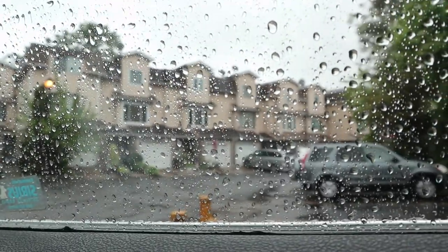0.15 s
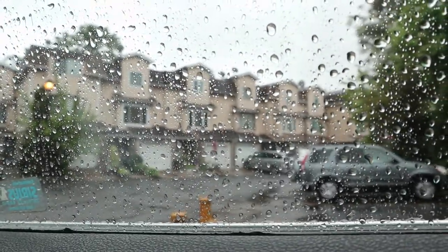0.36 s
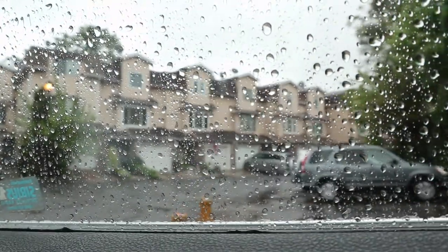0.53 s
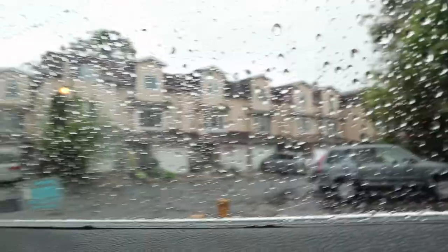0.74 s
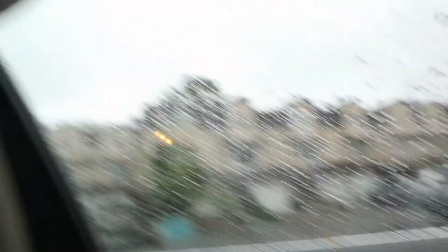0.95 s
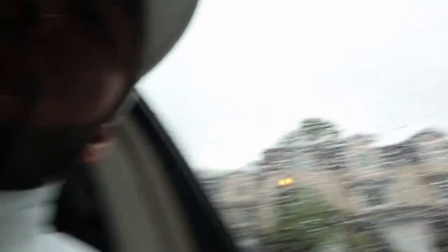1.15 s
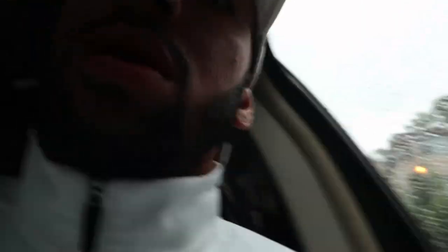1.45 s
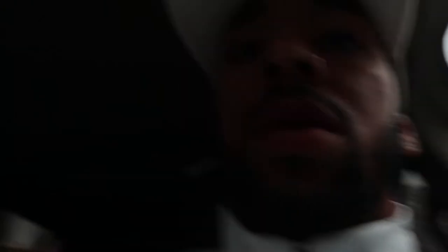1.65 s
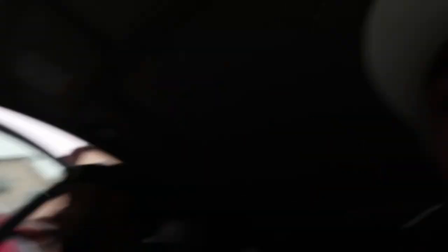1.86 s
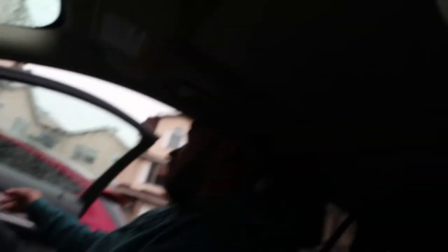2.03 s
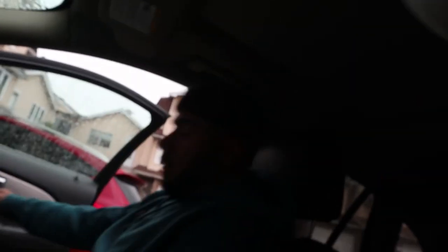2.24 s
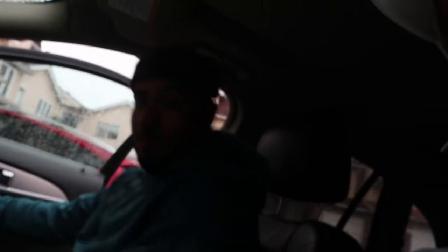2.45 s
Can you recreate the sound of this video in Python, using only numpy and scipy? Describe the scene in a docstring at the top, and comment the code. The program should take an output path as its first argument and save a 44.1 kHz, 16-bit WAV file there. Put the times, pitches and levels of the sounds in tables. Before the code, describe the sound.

Rain patters dully on a parked car while a door latch clunks open and cloth rustles inside

```python
"""Rain on a parked car, heard from the seat with a close pair of microphones, as mid and side parts.
Throughout, dull rain (fine ringing drops over hiss), swelling late, and the drumming body (low rings).
From 0.24 s a latch knocks (noise bursts) among thumps (damped rings) and snaps (short cracks);
a loose panel buzzes (pulses into resonances), with thin squeaks (wavering sines) and coloured rubs.
From 0.8 s the door opens and lets in the rain's hiss; from 1.1 s a jacket rustles (ringing grains)."""
import sys
import numpy as np
from scipy import signal
from scipy.fft import rfft, irfft
from scipy.io import wavfile

SR = 44100
rng = np.random.default_rng(int(sys.argv[2]) if len(sys.argv) > 2 else 0)


def volts_from_decibels(level):
    """Turn decibel levels (scalar or array-like) into linear amplitude factors."""
    exponent = np.asarray(level, float) / 20
    return 10 ** exponent


def waveform_to_disk(signal):
    """Save audio, clipped to [-1, 1], as 16-bit WAV at the path in sys.argv[1]."""
    frames = np.transpose(np.atleast_2d(signal))
    scaled = np.clip(frames, -1, 1) * 32767
    samples = np.round(scaled).astype(np.int16)
    wavfile.write(sys.argv[1], SR, samples)


N = 114660   # length [samples]


def rms_one(x):
    """Scale each row to rms 1."""
    return x / np.sqrt(np.mean(x ** 2, axis=-1, keepdims=True) + 1e-20)


def in_time(rows, outside=None):
    """Interpolate every column after the time to one value a sample."""
    times, *columns = np.transpose(rows)
    now = np.arange(N) / SR
    return [np.interp(now, times, column, outside, outside) for column in columns]


def colour(x, points, tilt_db=0.0):
    """Filter by a (frequency [Hz], level [dB]) table, tilted by dB per octave about 2 kHz."""
    hz = np.maximum(np.fft.rfftfreq(x.shape[-1], 1 / SR), 5)
    table = np.array(points)
    db = np.interp(np.log(hz), np.log(table[:, 0]), table[:, 1])
    db = db + tilt_db * np.log2(hz / 2000)
    return irfft(rfft(x) * volts_from_decibels(db), x.shape[-1])


def drift(rate_hz):
    """Slow random wander of rms 1: noise through two equal low-pass poles."""
    step = 40   # samples between computed points
    r = np.exp(-2 * np.pi * rate_hz * step / SR)
    noise = rng.standard_normal(N // step + 2002)
    slow = signal.lfilter([1], [1, -2 * r, r * r], noise)[2000:]   # settled part
    return np.interp(np.arange(N) / step, np.arange(len(slow)), rms_one(slow))


def resonate(x, hz, width_hz):
    """One damped resonance with gain about 1 at its peak."""
    r = np.exp(-np.pi * width_hz / SR)
    top = np.array([1, 0, -1]) * (1 - r * r) / 2
    return signal.lfilter(top, [1, -2 * r * np.cos(2 * np.pi * hz / SR), r * r], x)


def grains(per_s, spread_db, low_hz, high_hz, cycles, count=14):
    """Random clicks dealt to resonators spread in pitch; more cycles ring longer."""
    sizes = volts_from_decibels(spread_db * np.minimum(rng.exponential(1, (2, N)), 5))
    sizes = sizes * rng.choice([-1, 1], (2, N))
    clicks = sizes * (rng.random((2, N)) < per_s / SR) + 1e-18
    dealt = rng.integers(0, count, (2, N))
    pitches = np.geomspace(low_hz, high_hz, count)
    return sum(resonate(clicks * (dealt == k), hz, 2.83 * hz / cycles) for k, hz in enumerate(pitches))


def contacts(length):
    """An uneven run of hard touches over hiss, with a set touch near the start."""
    per_s, spread_db, hiss = 2200, 3.5, 0.5
    touched = rng.random(length) < per_s / SR
    sizes = volts_from_decibels(spread_db * np.minimum(rng.exponential(1, (2, length)), 3))
    sizes = sizes * rng.choice([-1, 1], (2, length))
    first = volts_from_decibels(2 * spread_db) * (np.arange(length) == round(KNOCK_RISE_S * SR))
    touches = np.where(first > 0, first, sizes * touched)
    return rms_one(touches) + hiss * rng.standard_normal((2, length))


def blow(t, rise_s, t60_s):
    """Envelope: quick rise, exponential fall."""
    return (1 - np.exp(-t / rise_s)) * volts_from_decibels(-60 * t / t60_s)


def add(out, start_s, piece):
    """Mix a piece in at its start time."""
    i = int(start_s * SR)
    out[:, i:i + piece.shape[-1]] += piece[..., :N - i]


# dull rain, there throughout and swelling towards the end: (time [s], level [dB])
DULL_RAIN = [(0, -50.5), (.22, -54), (.5, -56), (.75, -53), (2.6, -41)]
# its tone: (frequency [Hz], relative level [dB])
DULL_RAIN_TONE = [(180, -23), (300, -5), (420, -3), (700, -7.5), (1050, -8), (2000, -10.5), (4000, -17.5),
                  (8000, -32), (15400, -71)]
# rain through the open door: (time [s], level [dB])
OPEN_RAIN = [(.80, -61), (.88, -49.5), (.95, -44.5), (1.2, -43.5), (1.9, -46), (2.2, -43), (2.6, -46.5)]
# its tone: (frequency [Hz], relative level [dB])
OPEN_RAIN_TONE = [(180, -28), (300, 4.5), (366, -10.5), (590, -15), (719, -6.5), (984, -4.5),
                  (10200, -24.5), (13100, -27.5), (15400, -82)]
DROPS_PER_S, DROP_SPREAD_DB, DROP_SHARE, FLICKER_DB = 1500, 2.5, 0.4, 1.3


def rain():
    """Dense small drops over smooth hiss: a dull layer throughout, a bright one through the open door."""
    out = np.zeros((2, N))
    for path, tone in ((DULL_RAIN, DULL_RAIN_TONE), (OPEN_RAIN, OPEN_RAIN_TONE)):
        level_db, = in_time(path)
        drops = rms_one(grains(DROPS_PER_S, DROP_SPREAD_DB, 316, 8700, cycles=1.9))
        hiss = rng.standard_normal((2, N))
        raw = DROP_SHARE * drops + (1 - DROP_SHARE) * hiss
        out += volts_from_decibels(level_db + FLICKER_DB * drift(24)) * rms_one(colour(raw, tone))
    return out


# drumming of roof and body: (time [s], level above 85 Hz [dB], level of the deep rumble [dB])
DRUMMING = [(0, -41, -44.5), (.2, -43, -46.5), (.36, -31, -33.5), (.51, -52.5, -37.5), (.82, -48, -53),
            (1.06, -44.5, -43), (1.3, -42, -46), (1.52, -31, -44), (1.72, -31, -38), (1.9, -31, -38),
            (2.2, -38, -45), (2.4, -38.5, -39), (2.6, -39.5, -45)]
# its tone: (frequency [Hz], relative level [dB])
DRUMMING_TONE = [(12, -40.5), (22, -10), (49, 4.5), (75, -3.5), (112, -3.5), (230, -7.5), (300, -16),
                 (420, -22.5), (800, -57)]


def drumming():
    """Drops and small movements set the body's low modes going, over a deep rumble."""
    drum_db, deep_db = in_time(DRUMMING)
    hits = grains(per_s=1500, spread_db=1.5, low_hz=26, high_hz=503, cycles=3.74)
    raw = colour(hits, DRUMMING_TONE)
    deep = signal.sosfilt(signal.butter(4, 85, "low", fs=SR, output="sos"), raw)
    drum = signal.sosfilt(signal.butter(4, 85, "high", fs=SR, output="sos"), raw)
    return volts_from_decibels(drum_db) * rms_one(drum) + volts_from_decibels(deep_db) * rms_one(deep)


# knocks: (time [s], level [dB], centre [Hz], t60 [s], tilt [dB per octave])
KNOCK_EVENTS = [(.239, -33.5, 3270, 0.092, 1), (.246, -19, 920, 0.13, -2), (.614, -43, 1660, 0.15, -1),
                (.826, -32.5, 2070, 0.065, -2), (0.851, -31, 2860, 0.068, -1),
                (0.860, -26.5, 1240, 0.057, 2), (1.131, -39.5, 1590, 0.042, 4),
                (1.286, -43, 560, 0.063, -7), (1.567, -24, 830, 0.13, -3), (1.615, -18.5, 584, 0.085, -3),
                (1.663, -24, 460, 0.12, -8.5), (1.707, -20.5, 748, 0.054, -5), (1.814, -27.5, 332, .05, -4),
                (1.8525, -19, 1086, 0.096, -2.5), (2.0449, -25.5, 407, 0.06, -4.5),
                (2.091, -36, 1040, 0.041, -1), (2.112, -27, 2370, 0.033, 0), (2.130, -23.5, 2100, 0.071, 1),
                (2.178, -24.5, 607, 0.08, -1)]
# tone of knocks and snaps: (frequency [Hz], relative level [dB])
KNOCK_TONE = [(240, -10), (400, -4), (503, -6.5), (1020, -8), (1490, -9.5), (2180, -7), (7530, -26.5),
              (11600, -31), (15400, -45)]
KNOCK_RISE_S, KNOCK_BROAD_DB, KNOCK_WIDTH = 0.0006, -3.5, 0.24   # width as a share of the centre
TAIL_DB, TAIL_RISE_S, TAIL_T60_S, TAIL_CUT_HZ = -9, 0.0017, 0.26, 1400


def knocks():
    """A burst of hard contacts with its own resonance, then a dull tail from the cabin."""
    out, t = np.zeros((2, N)), np.arange(SR // 3) / SR
    dull = signal.butter(1, TAIL_CUT_HZ, fs=SR, output="sos")
    for start_s, db, hz, t60_s, tilt_db in KNOCK_EVENTS:
        noise = rms_one(colour(contacts(len(t)), KNOCK_TONE, tilt_db))
        burst = volts_from_decibels(KNOCK_BROAD_DB) * noise + rms_one(resonate(noise, hz, KNOCK_WIDTH * hz))
        tail = signal.sosfilt(dull, noise[:, ::-1])   # reversed, so it does not repeat the burst
        knock = burst * blow(t, KNOCK_RISE_S, t60_s)
        knock = knock + volts_from_decibels(TAIL_DB) * tail * blow(t, TAIL_RISE_S, TAIL_T60_S)
        add(out, start_s, volts_from_decibels(db) * knock)
    return out


# low thumps: (time [s], level [dB], pitch [Hz], t60 [s])
THUMP_EVENTS = [(.245, 0.5, 192.2, 0.067), (0.241, -13, 78.4, 0.14), (0.264, -22.5, 287.7, 0.2),
                (0.277, -4.5, 128.7, 0.078), (.298, -14.5, 136.1, 0.15), (.322, -13.5, 131.3, 0.11),
                (0.429, -16, 62.5, 0.13), (0.444, -17.5, 170, 0.05), (0.825, -11, 237, 0.058),
                (.853, -10.5, 201, 0.059), (0.859, -25, 62.5, 0.174), (0.883, -22.5, 151.5, 0.14),
                (0.918, -23.5, 187.6, 0.12), (1.006, -20, 177, 0.079), (1.215, -18.5, 137, 0.11),
                (1.218, -19.5, 52.6, 0.099), (1.286, -22, 167.1, 0.05), (1.324, -15.5, 53.8, 0.28),
                (1.465, -17, 110, 0.086), (1.542, -13, 170, 0.088), (1.541, -16.5, 70, 0.19),
                (1.58, -10, 113, 0.07), (1.613, -10.5, 134.4, 0.12), (1.661, -9, 88, 0.073),
                (1.698, -25, 150, 0.19), (1.814, -13.5, 126, 0.078), (1.858, -4, 171.6, 0.065),
                (2.046, -19, 165, 0.079), (2.131, -18.5, 145.3, 0.053), (2.174, -20.5, 115, 0.13),
                (2.256, -20.5, 119.8, 0.34), (2.294, -10, 100, 0.052)]
THUMP_RISE_SHARE = 0.059   # rise as a share of t60
THUMP_HOLD = 1.242   # above 1 the ring holds, then stops short
THUMP_SECOND_RATIO, THUMP_SECOND_DB = 1.45, -11   # upper partner


def thumps():
    """Each thump is a damped low ring with a weaker upper partner."""
    out, t = np.zeros((2, N)), np.arange(SR // 2) / SR
    for start_s, db, hz, t60_s in THUMP_EVENTS:
        ring = np.sin(2 * np.pi * hz * t)
        ring = ring + volts_from_decibels(THUMP_SECOND_DB) * np.sin(2 * np.pi * hz * THUMP_SECOND_RATIO * t)
        age = t / t60_s
        envelope = (1 - np.exp(-age / THUMP_RISE_SHARE)) * volts_from_decibels(-60 * age ** THUMP_HOLD)
        add(out, start_s, volts_from_decibels(db) * envelope * ring)
    return out


# sharp snaps: (time [s], level [dB])
SNAP_EVENTS = [(.247, -15.5), (0.828, -24), (0.865, -17), (1.851, -22), (2.130, -16.5), (2.178, -25)]


def snaps():
    """Bare short cracks of noise in the tone of the knocks, tilted down, without a tail."""
    out, t = np.zeros((2, N)), np.arange(SR // 3) / SR
    for start_s, db in SNAP_EVENTS:
        crack = rms_one(colour(rng.standard_normal((2, len(t))), KNOCK_TONE, tilt_db=-2.0))
        add(out, start_s, volts_from_decibels(db) * crack * blow(t, rise_s=0.0001, t60_s=0.009))
    return out


# resonances of the loose panel: (frequency [Hz], width [Hz], relative level [dB])
PANEL_MODES = [(500, 230, -2.5), (850, 410, -2), (1190, 250, -1.5), (1900, 800, -23.5)]
BUZZ_START_S, BUZZ_DB, BUZZ_RISE_S, BUZZ_T60_S = 0.28, -32.5, 0.011, 0.16
BUZZ_HZ, BUZZ_JITTER, BUZZ_UNEVEN_DB = 170, 0.028, 2.5   # jitter as a share of the rate
BUZZ_ROUGH, BUZZ_HOLD = 0.4, 1.8   # rattle between contacts; above 1 holds, then stops


def buzz():
    """Contacts of a loose panel, with rattle between them, drive its broad resonances."""
    out, t = np.zeros((2, N)), np.arange(SR // 4) / SR
    turns = np.cumsum(BUZZ_HZ * (1 + BUZZ_JITTER * drift(40)[:len(t)])) / SR
    clicks = np.diff(np.floor(turns), prepend=0)   # one click a turn
    clicks = clicks * volts_from_decibels(BUZZ_UNEVEN_DB * rng.standard_normal(len(t)))
    clicks = rms_one(clicks) + BUZZ_ROUGH * rms_one(contacts(len(t)))
    body = np.zeros((2, len(t)))
    for k, (hz, width_hz, db) in enumerate(PANEL_MODES):
        body += volts_from_decibels(db) * (-1) ** k * resonate(clicks, hz, width_hz)   # alternate signs
    envelope = (1 - np.exp(-t / BUZZ_RISE_S)) * volts_from_decibels(-60 * (t / BUZZ_T60_S) ** BUZZ_HOLD)
    add(out, BUZZ_START_S, volts_from_decibels(BUZZ_DB) * rms_one(body) * envelope)
    return out


# thin wavering squeaks: (time [s], length [s], pitch [Hz], level [dB])
SQUEAK_EVENTS = [(.30, 0.13, 3890, -62), (0.348, 0.03, 4870, -61), (.36, .08, 2740, -63),
                 (0.419, 0.063, 1403, -52.5), (1.97, 0.075, 661, -40.5)]
SQUEAK_WAVER, SQUEAK_FLUTTER_DB = 0.008, 4.5   # waver as a share of the pitch


def squeaks():
    """Near sines that waver in pitch and flutter in level."""
    out = np.zeros((2, N))
    for start_s, length_s, hz, db in SQUEAK_EVENTS:
        size = int(length_s * SR)
        pitch = hz * (1 + SQUEAK_WAVER * drift(30)[:size])
        tone = np.sin(2 * np.pi * np.cumsum(pitch) / SR)
        swell = np.sqrt(2 * np.sqrt(np.hanning(size)))
        add(out, start_s, volts_from_decibels(db + SQUEAK_FLUTTER_DB * drift(180)[:size]) * tone * swell)
    return out


# rubs of cloth, seat, handle and hinge:
# (time [s], length [s], centre [Hz], width of each of two passes [Hz], level [dB])
RUB_EVENTS = [(0.369, 0.068, 1900, 905, -48.5), (0.596, 0.047, 3100, 1510, -48),
              (0.646, 0.048, 2410, 1550, -51.5), (0.969, 0.074, 2920, 3100, -43.5),
              (0.987, .02, 930, 250, -36), (1.326, 0.15, 3610, 352, -40), (1.321, 0.12, 1870, 243, -40.5),
              (1.372, 0.051, 1510, 250, -33), (1.378, 0.029, 2470, 300, -37),
              (1.494, 0.035, 1400, 300, -32), (1.546, 0.03, 800, 250, -27.5),
              (1.552, 0.04, 1930, 1470, -28), (1.543, 0.03, 4900, 3030, -37),
              (1.657, 0.036, 2010, 450, -23), (1.653, 0.0342, 1180, 250, -23.5),
              (1.717, 0.034, 1880, 450, -22.5), (1.722, 0.037, 2680, 500, -31.5),
              (1.729, .03, 1360, 248, -27), (1.729, .028, 3530, 500, -35), (1.906, 0.068, 650, 200, -38),
              (2.248, 0.1, 420, 447, -35), (2.499, 0.093, 1900, 396, -42), (2.581, 0.02, 850, 300, -40)]


def rubs():
    """Grainy contacts twice through a resonance, swelling and fading."""
    out = np.zeros((2, N))
    for start_s, length_s, hz, width_hz, db in RUB_EVENTS:
        once = resonate(contacts(SR // 4), hz, width_hz)
        line = rms_one(resonate(once, hz, width_hz))[:, -int(length_s * SR):]
        add(out, start_s, volts_from_decibels(db) * line * np.sqrt(np.hanning(line.shape[1])))
    return out


# jacket and seat cloth rubbing: (time [s], level [dB])
RUSTLE_LEVEL = [(1.1, -64), (1.3, -42), (1.39, -33), (1.43, -34), (1.5, -30), (1.53, -31.5), (1.57, -22.5),
                (1.585, -33), (1.605, -32.5), (1.62, -29), (1.67, -23), (1.695, -33), (1.745, -28.5),
                (1.765, -34), (1.81, -33.5), (1.845, -36), (1.9, -39), (2.0, -45.5), (2.1, -36),
                (2.24, -43), (2.32, -42.5), (2.45, -42.5), (2.6, -35.5)]
# its tone: (frequency [Hz], relative level [dB])
RUSTLE_TONE = [(180, -32), (300, -14), (600, -3.5), (900, -8), (2000, -8), (4000, -17), (8000, -31),
               (14000, -44.5)]
RUSTLE_RAGGED_DB = 2.0


def rustle():
    """Cloth slips in many short ringing grains, in ragged bursts."""
    level_db, = in_time(RUSTLE_LEVEL, outside=-120)
    raw = grains(per_s=12000, spread_db=2.0, low_hz=355, high_hz=12100, cycles=25.0, count=30)
    return volts_from_decibels(level_db + RUSTLE_RAGGED_DB * drift(40)) * rms_one(colour(raw, RUSTLE_TONE))


# width of the pair: (frequency [Hz], gain of the side part [dB])
SIDE_TONE = [(60, -37), (110, -46), (200, -23.5), (380, -10), (700, -12.5), (1290, -10), (2380, -8),
             (4400, -1), (8120, 5), (15000, 11)]
CLOSE_SIDE_DB = -6.5   # extra side gain: thumps, knocks, snaps and buzz are narrower than the rain


def scene():
    """Mid and side of all sources, turned into left and right."""
    close = knocks() + thumps() + snaps() + buzz()
    close = close * volts_from_decibels(np.array([[0], [CLOSE_SIDE_DB]]))
    mid, side = rain() + drumming() + close + squeaks() + rubs() + rustle()
    side = colour(side, SIDE_TONE)
    return np.array([mid + side, mid - side])


def band_limit(x):
    """A steep low-pass at the top of the band."""
    return signal.sosfilt(signal.butter(12, 15600, fs=SR, output="sos"), x)


def record(dry):
    """A steep low-pass takes off the top, 60 dB down from 15.6 kHz."""
    top_cut = signal.cheby2(10, 60, 15600, fs=SR, output="sos")
    mix = signal.sosfilt(top_cut, dry)
    return band_limit(mix)


dry = scene()
out = record(dry)
waveform_to_disk(out)
```